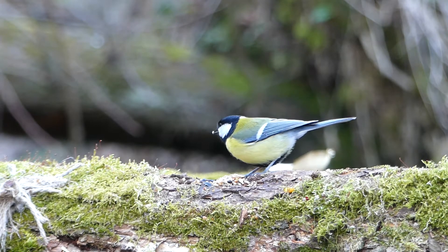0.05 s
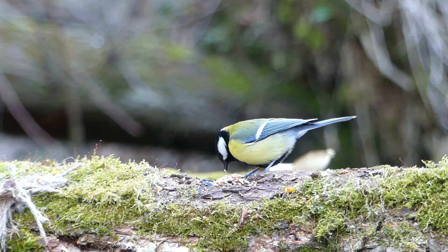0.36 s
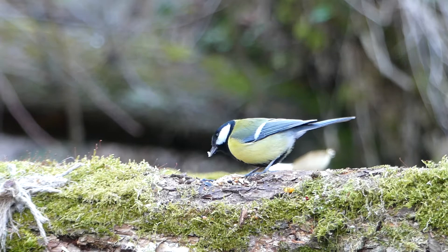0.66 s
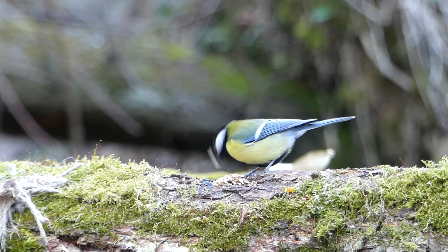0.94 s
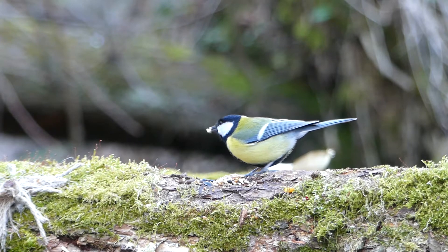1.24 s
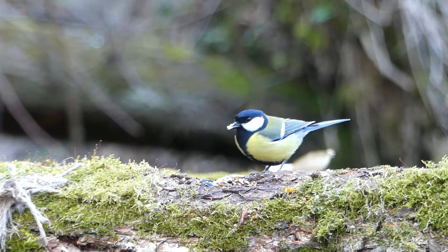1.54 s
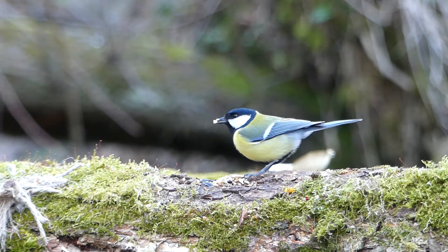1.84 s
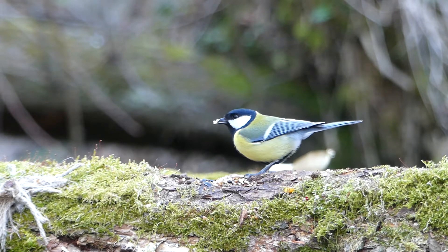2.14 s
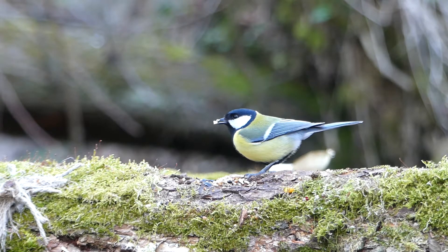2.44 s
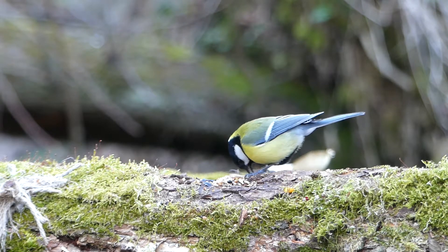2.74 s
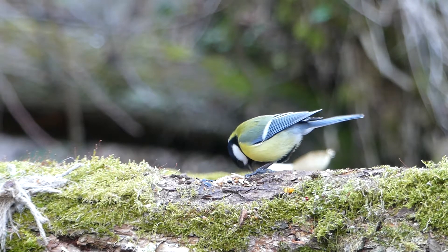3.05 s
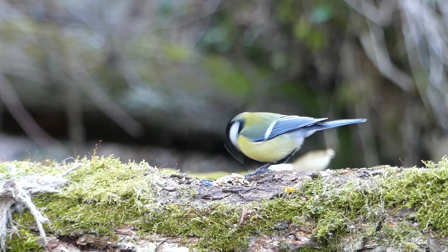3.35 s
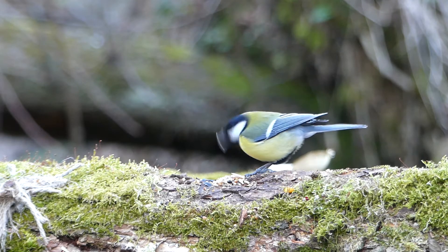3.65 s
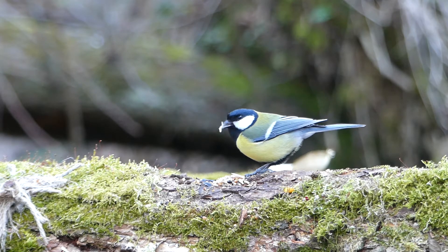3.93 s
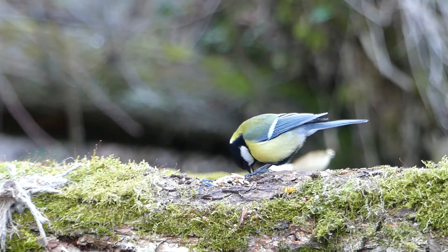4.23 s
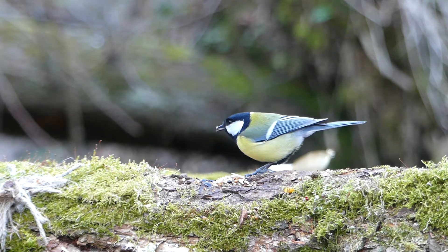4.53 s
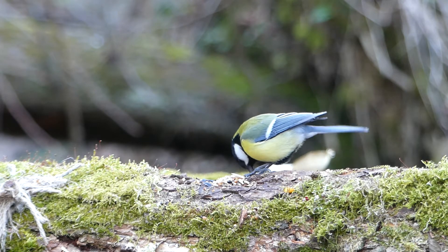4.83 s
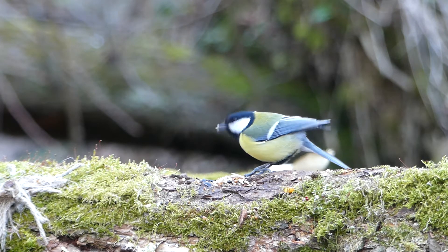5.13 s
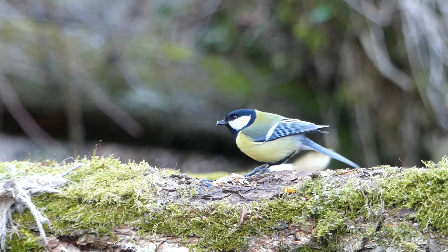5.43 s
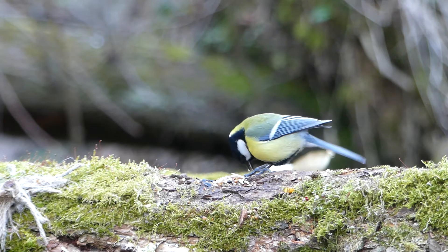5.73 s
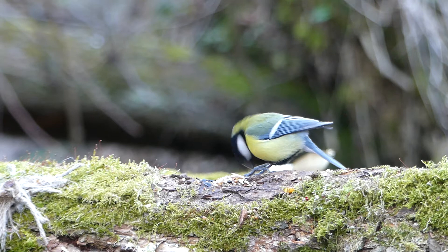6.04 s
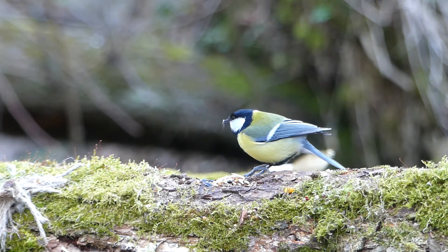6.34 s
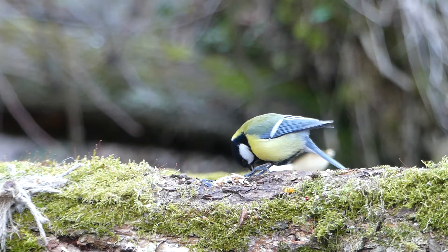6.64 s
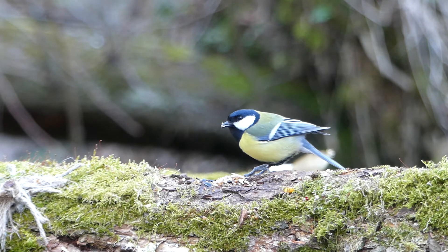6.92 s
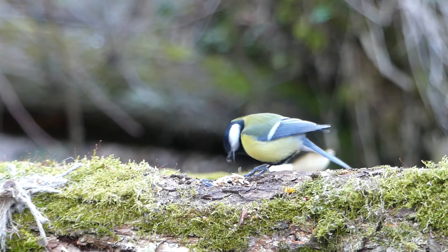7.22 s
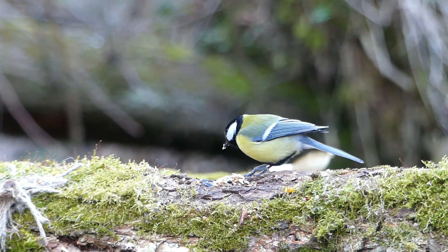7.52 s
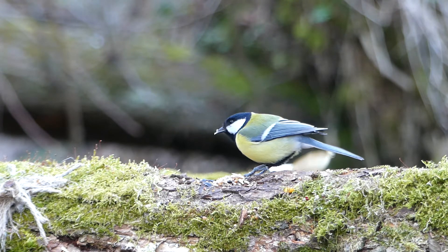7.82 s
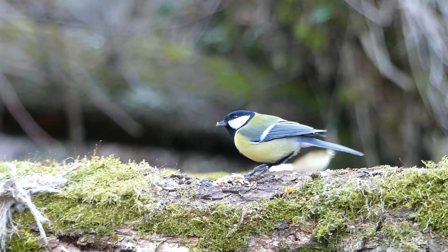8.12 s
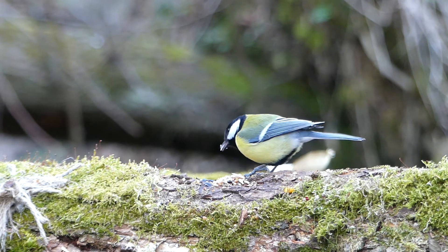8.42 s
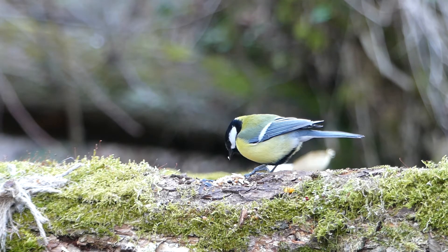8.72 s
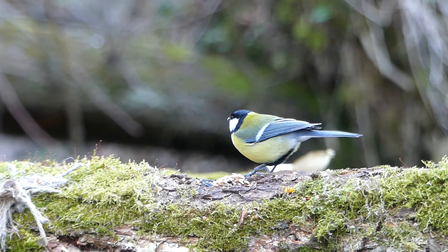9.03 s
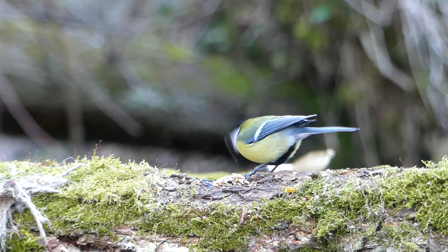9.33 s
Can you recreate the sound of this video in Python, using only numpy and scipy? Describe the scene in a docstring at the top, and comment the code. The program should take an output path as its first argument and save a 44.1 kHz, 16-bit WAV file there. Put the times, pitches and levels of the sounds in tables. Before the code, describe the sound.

Small songbirds whistle, chirp and warble in a wood over a soft distant rush, while a tit ticks its beak on seeds.

```python
"""Small songbirds call in a wood, over a soft distant rush and microphone hiss. Thin whistles and a
faint twitter come first, while a tit on a feeding log ticks its beak on seeds. After a second come
hoarse notes, the tit's rustles and hops, sharp "pink" calls, very high flicks and a two-note song.
From about 4.5 s a warbled song slides and trills, and near the end come two loud rising "hweet" calls
and two low fluty notes. The tree trunks scatter every call, so that it rings on."""
import sys
import numpy as np
from scipy import signal
from scipy.fft import rfft, irfft, next_fast_len
from scipy.io import wavfile
from scipy.ndimage import map_coordinates

SR = 44100
rng = np.random.default_rng(int(sys.argv[2]) if len(sys.argv) > 2 else 0)


def wav_out(sig):
    """Save sig, one row per channel (or a flat mono array), as 16-bit PCM at SR to the path in sys.argv[1]."""
    wavfile.write(sys.argv[1], SR, np.round(np.clip(np.atleast_2d(sig).T, -1, 1) * 32767).astype(np.int16))


N = 413216


def amp(db):
    """Turn decibels into a number to multiply by."""
    return 10 ** (np.asarray(db) / 20)


def unit(x):
    """Scale a sound to an average strength (rms) of 1."""
    return x / np.sqrt(np.mean(x ** 2) + 1e-20)


def along(points, hz):
    """Read between (frequency, value) points, with the octaves evenly spaced."""
    freqs, values = np.transpose(points)
    return np.interp(np.log(hz + 1), np.log(freqs + 1), values)


def filtered(x, response):
    """Turn each frequency of a sound up or down by response(hz)."""
    size = next_fast_len(N + SR // 2)
    return irfft(rfft(x, size) * response(np.fft.rfftfreq(size, 1 / SR)), size)[..., :N]


def wobble(t, rate):
    """A smooth curve through `rate` random values a second."""
    return map_coordinates(rng.standard_normal(512), [t * rate], mode="mirror")


def clock(length):
    """Seconds since a note began (t), and the share of it gone by (u, from 0 to 1)."""
    t = np.arange(int(length * SR)) / SR
    return t, t / length


def swell(u, rise, fall):
    """Fade in over the share `rise` of a note and out over the share `fall`."""
    fade_in = np.sin(np.pi / 2 * np.clip(u / rise, 0, 1))
    return fade_in * np.sin(np.pi / 2 * np.clip((1 - u) / fall, 0, 1))


def tone(hz):
    """A pure tone that follows a pitch curve."""
    return np.sqrt(2) * np.sin(2 * np.pi * np.cumsum(hz) / SR) * (hz < SR / 2)


def note(hz, db, rough, jitter=0.11, octave_db=-34, flutter_db=2):
    """One whistled note: its strength flutters, and the rougher it is, the more its pitch shakes."""
    t = np.arange(len(hz)) / SR
    hz = hz * (1 + jitter * rough * wobble(t, 445.7))
    loudness = amp(db + flutter_db * wobble(t, 45)) * swell(t / t[-1], .14, .07)
    return loudness * (tone(hz) + amp(octave_db) * tone(2 * hz))


def contour(shape, length):
    """Stretch (share of the note, value) points over one note."""
    return np.interp(clock(length)[1], *np.transpose(shape))


def add(track, start, sound):
    """Mix a sound into a track at `start` seconds."""
    part = track[max(round(start * SR), 0):][:len(sound)]
    part += sound[:len(part)]


# How wide the background sounds: (frequency [Hz], side level above mid [dB])
STEREO_WIDTH = [(60, 2), (110, 10.5), (200, 13), (380, 8.5), (700, 8), (1290, 7), (2380, 3), (4400, -3.5),
                (8120, -6), (15000, -3.5)]


def wide_noise(level_db):
    """Noise shaped by level_db(hz). Both ears share the mid; the side sets them apart."""
    mid, side = filtered(rng.standard_normal((2, N)), lambda hz: amp(level_db(hz)))
    side = filtered(side, lambda hz: amp(along(STEREO_WIDTH, hz)))
    return np.array([mid + side, mid - side]) / np.std(mid)


# How the rush swells and sinks: (time [s], level [dB])
RUSH_SWELLS = [(0.0, -68.5), (0.78, -70), (1.12, -68), (5.72, -69), (5.95, -67.5), (6.37, -69.5),
               (8.9, -68.5), (9.37, -69)]
# The rush from low to high: (frequency [Hz], relative level [dB])
RUSH_COLOUR = [(15, -51), (25, -17), (279, -3), (372, -3.5), (481, -0.5), (653, -8), (814, -9.5),
               (1090, -11.5), (1350, -15.5), (1450, -16.5), (1880, -40), (3190, -120)]
# Bands that stand out of the rush or sink into it: (frequency [Hz], width [Hz], boost [dB])
RUSH_BANDS = [(487, 29, 1), (760, 130, -0.5), (820, 56, 5)]


def distant_rush(level_db=-68.5, unrest_db=0.83):
    """A soft, low rush that slowly swells, a little to the right."""
    def colour_db(hz):
        bands = sum(db / (1 + ((hz - centre) / (width / 2)) ** 2) for centre, width, db in RUSH_BANDS)
        return along(RUSH_COLOUR, hz) + bands

    t = np.arange(N) / SR
    times, levels = np.transpose(RUSH_SWELLS)
    drift_db = np.interp(t, times, levels - np.median(levels)) + unrest_db * wobble(t, 7.7)
    return amp(level_db + drift_db) * amp([[-.9], [.9]]) * wide_noise(colour_db)


# The hiss from low to high: (frequency [Hz], relative level [dB])
HISS_COLOUR = [(710, -34), (1200, -7), (1930, -3), (2240, -3.5), (3380, -3.5), (3890, -6.5), (5550, -3),
               (7110, -5.5), (9830, -2), (15800, -6)]


def microphone_hiss(level_db=-64):
    """The microphone's own even hiss."""
    return amp(level_db) * wide_noise(lambda hz: along(HISS_COLOUR, hz))


# Nearly flat whistles: (time [s], length [s], pitch [Hz], level [dB])
THIN_WHISTLES = [(0, 0.048, 2748, -47.5), (.11, .15, 2755, -59), (0.335, 0.12, 2630, -50),
                 (0.547, 0.084, 2696, -49.5), (.71, 0.038, 4400, -72.5), (0.952, .1, 4420, -75),
                 (1.02, 0.13, 2614, -52), (1.264, 0.061, 2845, -49), (3.321, 0.065, 4290, -66),
                 (3.615, 0.048, 4340, -64.5), (6.445, 0.028, 4190, -63)]


def whistles(sag=0.037):
    """Thin, pure whistles, each losing the share `sag` of its pitch."""
    out = np.zeros(N)
    for start, length, hz, db in THIN_WHISTLES:
        _, u = clock(length)
        add(out, start, note(hz * (1 + sag * (.5 - u)), db, rough=0.079))
    return out


# Birds farther off: (time [s], length [s], first pitch [Hz], last pitch [Hz], level [dB])
FAR_TWITTER = [(0, 0.093, 4250, 3376, -67.5), (3.427, 0.17, 6130, 5150, -73),
               (6.225, 0.079, 5200, 4150, -76.5), (6.864, 0.062, 6560, 7600, -71),
               (7.3, 0.56, 6640, 5790, -79), (7.848, .86, 7360, 5930, -75.5),
               (8.157, .15, 5600, 5250, -68.5), (8.497, 0.82, 5900, 5710, -75)]


def twitter(buzz=0.0412, leap=0.062, chop_db=5):
    """Thin, buzzy glides that break up into little chirps of changing pitch."""
    out = np.zeros(N)
    for start, length, first_hz, last_hz, db in FAR_TWITTER:
        t, u = clock(length)
        glide_hz = first_hz + (last_hz - first_hz) * u
        hz = glide_hz * (1 + buzz * wobble(t, 900) + leap * wobble(t, 35))
        chirps = unit(amp(chop_db * wobble(t, 35.9)) * tone(hz))
        add(out, start, amp(db) * swell(u, 0.027, 0.2) * chirps)
    return out


# The beak hits a seed: (time [s], level [dB])
SEED_PECKS = [(0.3844, -45), (0.4213, -43), (0.585, -41), (2.169, -45), (2.2294, -43), (4.0006, -46),
              (5.4723, -36.5), (5.81, -44), (5.86, -44), (7.6186, -44), (7.6794, -45)]


def beak_ticks(gain_db=-4, ring_s=.022):
    """The beak strikes dry seed husks: tiny bursts of noise with the lows turned down."""
    out = np.zeros(N)
    t, _ = clock(.2)
    burst = amp(-60 * t / ring_s) * (1 - np.exp(-t / .001))
    for start, db in SEED_PECKS:
        add(out, start, amp(db + gain_db) * burst * rng.standard_normal(len(t)))
    return filtered(out, lambda hz: hz / (hz + 2500))


# Low, hoarse notes: (time [s], length [s], pitch [Hz], level [dB])
HOARSE_NOTES = [(1.175, .045, 1845, -60), (1.168, 0.082, 2920, -58.5), (2.908, 0.069, 1836, -62.5),
                (4.526, 0.044, 2002, -63.5), (4.742, 0.16, 2110, -63.5), (5.386, 0.074, 2310, -55.5),
                (5.963, 0.024, 2240, -56), (6.197, .072, 2200, -55), (7.27, 0.041, 1903, -64.5),
                (7.316, 0.062, 2322, -50), (7.367, 0.066, 2044, -55)]


def churrs(sag=0.1063, low_hz=1850):
    """Hoarse, sagging notes; the lower the note, the stronger the overtone an octave above it."""
    out = np.zeros(N)
    for start, length, hz, db in HOARSE_NOTES:
        _, u = clock(length)
        octave_db = -4 - 65 * np.log2(hz / low_hz)
        add(out, start, note(hz * (1 + sag * (.5 - u)), db, rough=0.4, octave_db=octave_db))
    return out


# The tit shifts about: (time [s], length [s], level [dB])
SHUFFLES = [(1.297, 0.33, -77), (5.77, 0.4, -71)]


def rustles(centre_hz=470, width_hz=220, lumps_db=3):
    """Feathers and moss brush the log in dull, lumpy puffs."""
    puffs = np.zeros(N)
    for start, length, db in SHUFFLES:
        t, u = clock(length)
        add(puffs, start, amp(db + lumps_db * wobble(t, 19.2)) * swell(u, 0.11, 0.15))
    brush = filtered(rng.standard_normal(N), lambda hz: 1 / (1 + (2 * (hz - centre_hz) / width_hz) ** 2))
    return puffs * unit(brush)


# Sharp "pink" calls: (time [s], length [s], rise time [s], held pitch [Hz], level [dB])
PINK_CALLS = [(1.357, 0.071, 0.023, 5590, -36), (1.544, 0.095, 0.044, 4313, -36.5),
              (1.866, 0.1, 0.042, 4132, -39), (2.302, 0.07, 0.03, 4227, -38.5),
              (3.11, 0.082, 0.029, 5750, -37.5), (6.531, 0.088, .043, 4264, -41),
              (6.775, 0.078, 0.039, 4235, -36), (7.071, 0.061, 0.04, 4380, -36.5)]
# How well the bird's throat lets each frequency out: (frequency [Hz], gain [dB])
THROAT_COLOUR = [(2000, -7), (3100, -5), (3700, -3.5), (4200, -1.5), (6500, -1.5), (7500, -23),
                 (8600, -14.5), (13000, -10)]


def pinks(first_hz=2250, waver=0.015, rasp=0.026, sag=0.0422, rasp_db=-13, lead_s=.017):
    """A rasp opens the call; overtones flash as the rising pitch sweeps them through the throat."""
    voices, rasps = np.zeros(N), np.zeros(N)
    for start, length, rise_s, held_hz, db in PINK_CALLS:
        t, u = clock(length)
        climb = (1 + (t / rise_s + 1e-3) ** -8) ** (-1 / 8)  # shoots from 0 to 1, then holds
        shake = (waver + rasp * (1 - climb)) * wobble(t, 392.7)
        hz = (first_hz + (held_hz - first_hz) * climb) * (1 + shake + sag * (.7 - u))
        # near the held pitch the main tone grows and its two overtones fade
        levels_db = [-19 * (1 - climb), -5 - 14 * climb ** 8, -19 - 14 * climb ** 8]
        voice = sum(amp(level + along(THROAT_COLOUR, k * hz)) * tone(k * hz)
                    for k, level in enumerate(levels_db, 1))
        add(voices, start, amp(db) * swell(u, 0.088, 0.28) * voice)
        t, u = clock(lead_s + rise_s)
        burst = amp(db + rasp_db + 4.1 * wobble(t, 320)) * swell(u, 0.2, 1.0)
        add(rasps, start - lead_s, burst * rng.standard_normal(len(t)))
    rasps = filtered(rasps, lambda hz: amp(along(THROAT_COLOUR, hz)) * (hz > 1800) / (1 + (hz / 1e4) ** 6))
    return voices + 2 * rasps


# Soft blows on the log: (time [s], pitch [Hz], level [dB])
LOG_BLOWS = [(1.39, 293, -60.5), (1.589, 517, -61), (2.36, 567, -70), (3.17, 536, -65), (5.474, 293, -59),
             (6.095, 450, -67)]


def log_knocks(gain_db=10.5, ring_s=0.07):
    """The tit hops, and the log answers with one dull tone that dies quickly."""
    out = np.zeros(N)
    t, _ = clock(.2)
    thud = amp(-60 * t / ring_s) * (1 - np.exp(-t / 0.0016))
    for start, hz, db in LOG_BLOWS:
        add(out, start, amp(db + gain_db) * thud * np.sin(2 * np.pi * hz * t))
    return out


# Very high "tsip" calls: (time [s], length [s], level [dB])
TSIP_CALLS = [(1.517, 0.042, -47), (3.26, 0.076, -51)]
# The tune of one call: (share of the note [0-1], pitch [Hz])
TSIP_TUNE = [(0, 6150), (.12, 9100), (.22, 7030), (.55, 6680), (1, 6380)]


def tsips():
    """Very high, slightly rough calls that flick up and drop onto a nearly steady pitch."""
    out = np.zeros(N)
    for start, length, db in TSIP_CALLS:
        add(out, start, note(contour(TSIP_TUNE, length), db, rough=0.14))
    return out


# Pairs of notes, low then high: (time [s], low length [s], low pitch [Hz], low level [dB],
# delay to the high note [s], high level [dB])
NOTE_PAIRS = [(1.668, 0.036, 2532, -53, 0.13, -51.5), (2.114, 0.1, 2590, -56.5, 0.12, -51),
              (2.602, 0.086, 2440, -60, .145, -50), (3.083, 0.097, 2390, -59, 0.16, -54)]
# The low note dips and lifts: (share of the note [0-1], pitch [ratio])
LOW_NOTE_BEND = [(0, 1), (.4, .985), (1, 1.055)]


def two_note_song():
    """A soft low note, then always the same upward slide, about twice a second."""
    out = np.zeros(N)
    slide_hz = contour([(0, 2860), (.5, 3150), (1, 3280)], length=.092)
    for start, length, low_hz, low_db, delay, high_db in NOTE_PAIRS:
        add(out, start, note(low_hz * contour(LOW_NOTE_BEND, length), low_db, rough=0.19))
        add(out, start + delay, note(slide_hz, high_db, rough=0.087))
    return out


# Notes that slide down: (time [s], length [s], first pitch [Hz], last pitch [Hz], level [dB])
FALLING_NOTES = [(2.952, 0.016, 2820, 2240, -55), (5.223, 0.035, 2470, 2064, -56),
                 (5.429, 0.102, 3070, 2804, -52), (5.85, 0.055, 2730, 2066, -59.5),
                 (5.875, 0.095, 3300, 2850, -55), (6.125, 0.09, 3120, 2780, -54),
                 (6.559, 0.067, 3360, 2590, -48.5), (6.908, .095, 3410, 2590, -48),
                 (7.293, .02, 3210, 2470, -51), (7.345, .085, 3560, 2690, -52.5)]


def falls(ease=2.02, swell_db=6.5):
    """The pitch drops fast, then eases in to land as the note grows louder."""
    out = np.zeros(N)
    for start, length, first_hz, last_hz, db in FALLING_NOTES:
        _, u = clock(length)
        fallen = np.expm1(-ease * u) / np.expm1(-ease)  # from 0 to 1
        hz = first_hz + (last_hz - first_hz) * fallen
        add(out, start, note(hz, db - swell_db * (1 - fallen), rough=0.1))
    return out


# Notes that flick up: (time [s], length [s], top pitch [Hz], level [dB])
FLICKED_NOTES = [(4.568, .042, 2640, -56.5), (4.629, 0.046, 3185, -57), (5.252, 0.13, 3160, -61),
                 (5.824, 0.058, 3380, -62.5), (7.941, 0.03, 2775, -56), (8.018, 0.032, 3400, -63.5),
                 (8.063, 0.028, 4120, -59), (8.752, 0.04, 2843, -58.5), (8.77, 0.045, 3310, -61)]


def flicks(depth=0.3, climb_s=.014):
    """Each note starts the share `depth` below its top pitch, darts up and holds."""
    out = np.zeros(N)
    for start, length, top_hz, db in FLICKED_NOTES:
        t, _ = clock(length)
        add(out, start, note(top_hz * (1 - depth * np.exp(-t / climb_s)), db, rough=0.17))
    return out


# Quick trills: (time [s], length [s], pitch [Hz], swing each way [Hz], swings [per s], level [dB])
TRILLED_NOTES = [(4.742, 0.19, 2785, 240, 36, -55.5), (5.986, 0.16, 2425, 235, 83, -50),
                 (6.239, 0.159, 2550, 324, 26, -52)]


def trills(pulse_db=5, scatter=0.031, uneven=0.67):
    """The pitch swings up and down at a slightly uneven pace; each downward sweep is the loud one."""
    out = np.zeros(N)
    for start, length, pitch_hz, swing_hz, rate, db in TRILLED_NOTES:
        t, u = clock(length)
        turn = 2 * np.pi * rate * t + uneven * wobble(t, 30.1)
        hz = (pitch_hz + swing_hz * np.cos(turn)) * (1 + scatter * wobble(t, 294.0))
        voice = unit(amp(pulse_db * np.sin(turn)) * tone(hz))
        add(out, start, amp(db) * swell(u, 0.029, 0.12) * voice)
    return out


# Rising "hweet" calls: (time [s], length [s], first pitch [Hz], last pitch [Hz], level [dB])
HWEET_CALLS = [(5.994, 0.12, 2970, 4400, -66.5), (8.156, 0.15, 2895, 4390, -37),
               (8.973, .18, 2967, 4386, -36.5)]


def hweets(scoop=.44, scoop_s=0.018, onset_s=.009, fade_db=-9.0, second_db=-26, third_db=-29):
    """A nearly pure whistle that scoops up fast and loud, then climbs more slowly as it weakens."""
    out = np.zeros(N)
    for start, length, first_hz, last_hz, db in HWEET_CALLS:
        t, u = clock(length)
        climb = scoop * (1 - np.exp(-t / scoop_s)) + (1 - scoop) * np.sin(u) / np.sin(1)
        hz = (first_hz + (last_hz - first_hz) * climb) * (1 + 0.0042 * wobble(t, 188))
        voice = tone(hz) + amp(second_db) * tone(2 * hz) + amp(third_db) * tone(3 * hz)
        opening = 1 - np.exp(-(t / onset_s) ** 2)
        add(out, start, amp(db + fade_db * u) * opening * swell(u, .02, 0.22) * voice)
    return out


# Low, fluty notes: (time [s], length [s], pitch [Hz], level [dB])
FLUTY_NOTES = [(7.959, 0.122, 1588, -55), (8.776, .09, 1640, -52.5)]


def flutes(lift=0.062, swell_db=11.5):
    """Mellow low notes that start softly and lift in pitch as they swell."""
    out = np.zeros(N)
    for start, length, hz, db in FLUTY_NOTES:
        _, u = clock(length)
        slack = (1 - u) ** 2
        add(out, start, note(hz * (1 + lift * (0.2 - slack)), db - swell_db * slack, rough=0.19))
    return out


# How long the wood rings: (frequency [Hz], time to fade by 60 dB [s])
WOOD_RING = [(1500, 0.88), (2800, 1), (4300, 0.84), (6600, 0.63), (12000, 0.22)]


def wood(x, direct_db, near_db, far_db, right_db, near_ring_s=0.22, side_db=-5):
    """The direct call, a quick scatter off the nearest trunks and the long ring of the wood."""
    hz, t, (far, near) = signal.stft(rng.standard_normal((2, 2, SR)), SR, nperseg=256)
    far = far * amp(-60 * t / along(WOOD_RING, hz)[:, None]) * (1 - np.exp(-t / 0.012))
    near = near * amp(-60 * t / near_ring_s) * (1 - np.exp(-t / 0.00046))
    far, near = (signal.istft(bands, SR, nperseg=256)[1] for bands in (far, near))
    echoes = amp(near_db) * near / np.linalg.norm(near[0]) + amp(far_db) * far / np.linalg.norm(far[0])
    mid, side = signal.fftconvolve(x[None], echoes, axes=1)[:, :N]
    mid, side = mid + amp(direct_db) * x, amp(side_db) * side
    return np.array([mid + side, mid - side]) * amp([[-right_db], [right_db]])


def scene():
    """Near callers a little to the left, the singers deeper in the wood to the right."""
    warble = churrs() + falls() + flicks() + flutes()
    birds = (wood(whistles(), direct_db=-1.5, near_db=-4, far_db=-3.5, right_db=.9)
             + wood(twitter(), direct_db=4, near_db=-5.5, far_db=2, right_db=0)
             + wood(warble, direct_db=-0.5, near_db=-5.5, far_db=-5, right_db=.6)
             + wood(pinks(), direct_db=-6, near_db=-5.5, far_db=-10.5, right_db=-1.1)
             + wood(tsips() + two_note_song(), direct_db=-3.5, near_db=-3.5, far_db=-4, right_db=.3)
             + wood(trills(), direct_db=0, near_db=-4.5, far_db=-6, right_db=.4)
             + wood(hweets(), direct_db=-5.5, near_db=-1, far_db=-8.5, right_db=-.2))
    tit_on_log = beak_ticks() + rustles() + log_knocks()
    return distant_rush() + microphone_hiss() + birds + tit_on_log


def record(dry, top_hz=15800):
    """Cut away the very highest treble."""
    return filtered(dry, lambda hz: hz < top_hz)


dry = scene()
out = record(dry)
wav_out(out)
```